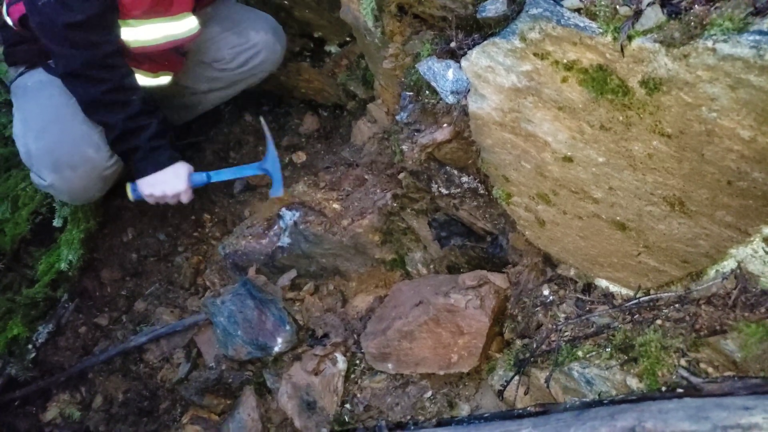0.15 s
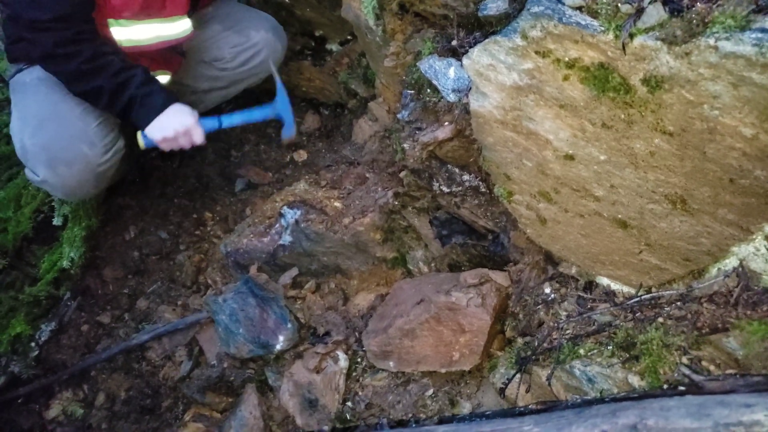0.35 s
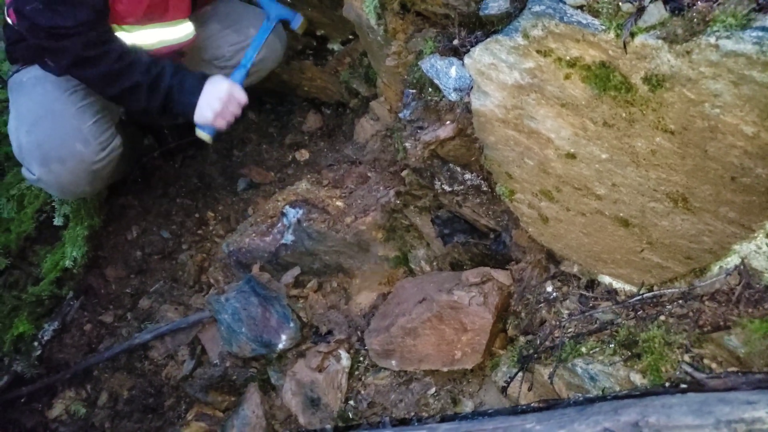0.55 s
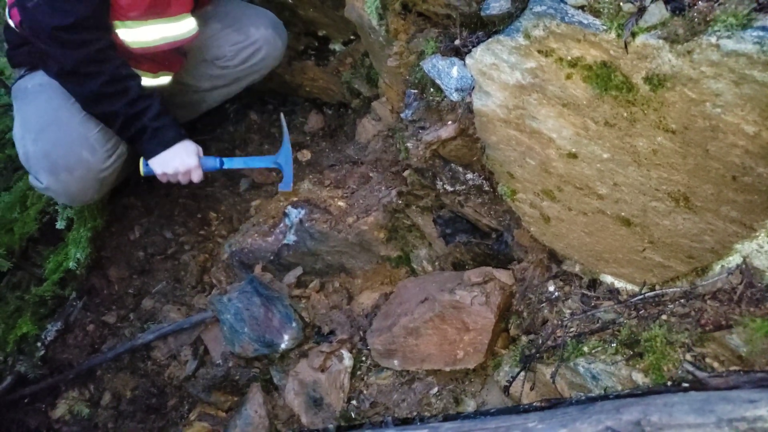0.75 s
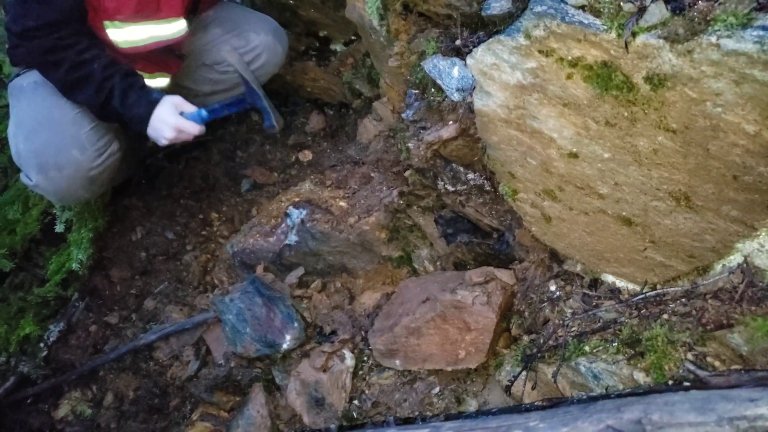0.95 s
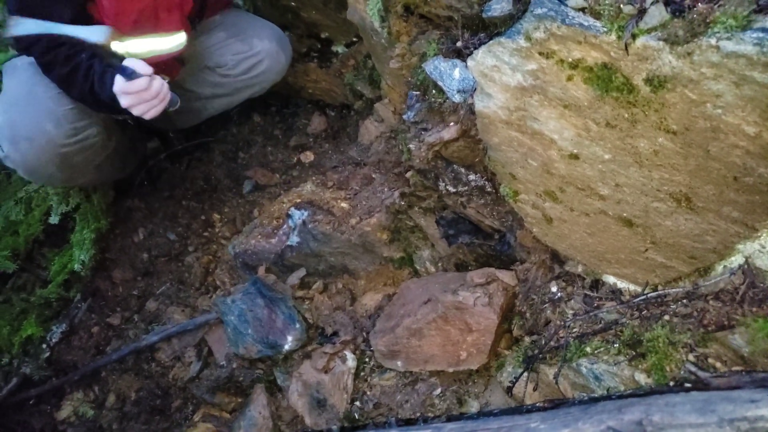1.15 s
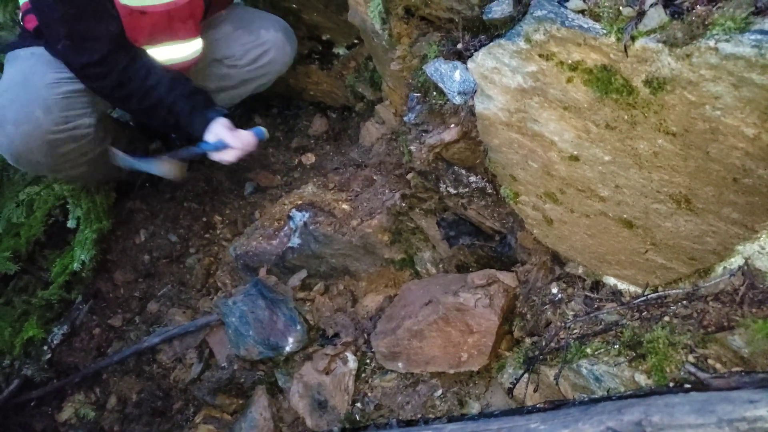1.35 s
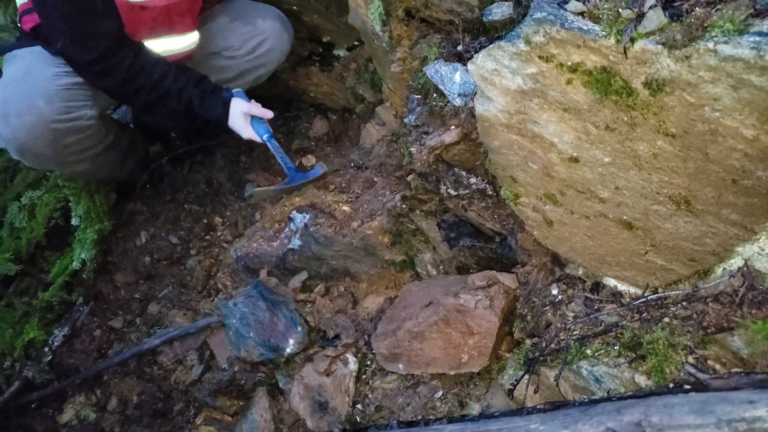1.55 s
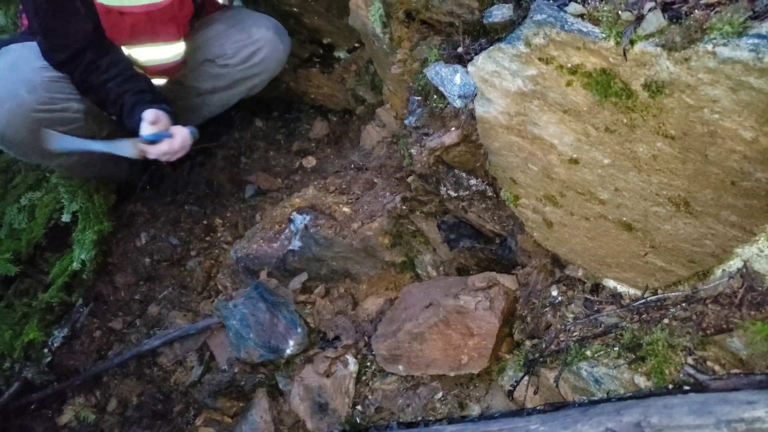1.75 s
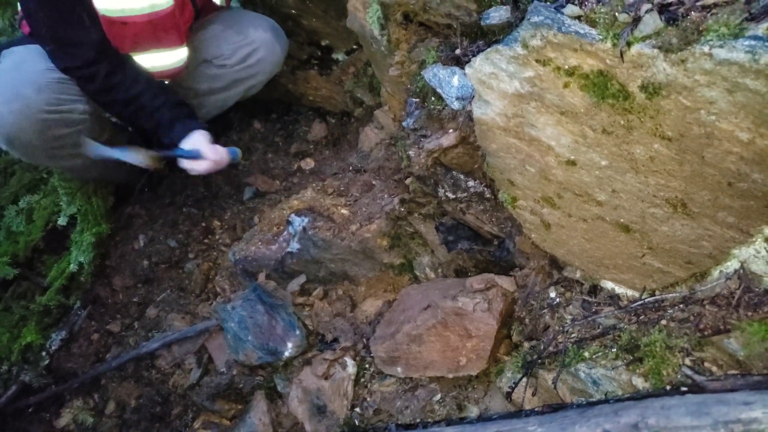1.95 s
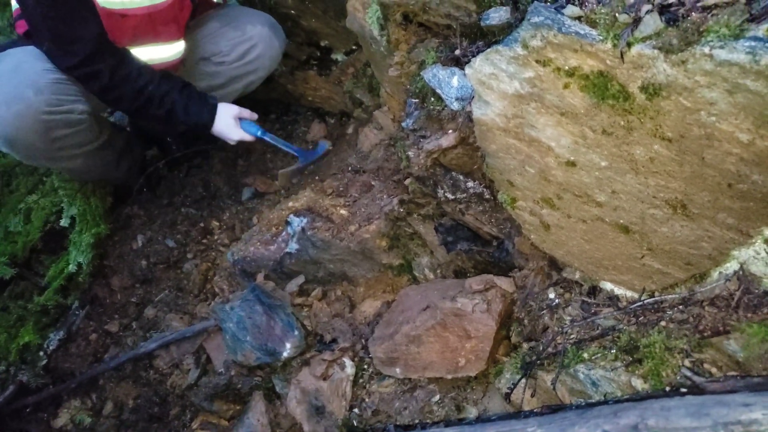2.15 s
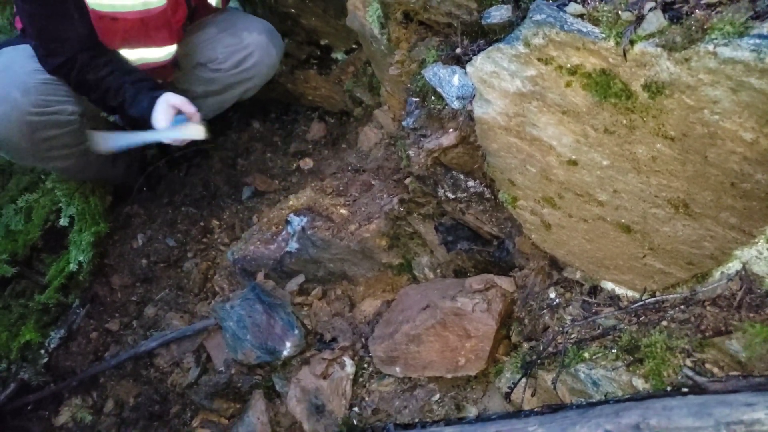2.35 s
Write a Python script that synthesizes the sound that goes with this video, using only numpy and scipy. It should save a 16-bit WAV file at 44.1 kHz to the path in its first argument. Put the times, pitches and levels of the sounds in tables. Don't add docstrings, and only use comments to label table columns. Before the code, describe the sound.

Four separate hammer blows crack on rock, the first loudest, the second thuddiest, the last softest. Loose grit patters, a sleeve rustles and the grip creaks faintly outdoors, heard close and dry, leaning left.

```python
import sys
import numpy as np
from scipy import signal
from scipy.fft import rfft, irfft
from scipy.io import wavfile
from scipy.ndimage import uniform_filter1d

SR = 44100
rng = np.random.default_rng(int(sys.argv[2]) if len(sys.argv) > 2 else 0)


def transcribe(signal):
    frames = np.atleast_2d(signal).T
    limited = np.clip(frames, -1, 1)
    pcm = np.round(limited * 32767).astype(np.int16)
    wavfile.write(sys.argv[1], SR, pcm)


def boost(x):
    u = np.asarray(x, float) / 20
    return 10 ** u


N = 105840
GRAZE_S = 0.003
CRUSH_S = 0.000628


def evened(x):
    return x / np.sqrt(np.mean(x ** 2) + 1e-20)


def left_right(db):
    return boost(np.array([[db], [-db]]))


def read(points, hz):
    f, value = np.transpose(points)
    return np.interp(np.log(hz + 1), np.log(f + 1), value)


def add(mix, s, sound):
    part = mix[..., round(s * SR):][..., :sound.shape[-1]]
    part += sound[..., :part.shape[-1]]


def high_pass(x, order, hz):
    return signal.sosfilt(signal.butter(order, hz, "high", fs=SR, output="sos"), x)


def colour(x, points):
    half = np.log(boost(read(points, np.fft.rfftfreq(2048, 1 / SR))))
    full = np.r_[half, half[-2:0:-1]]
    response = np.exp(full - 1j * signal.hilbert(full).imag)
    taps = np.fft.ifft(response).real[:1024]
    return signal.oaconvolve(x, taps / np.linalg.norm(taps))[:len(x)]


def ring(modes, t):
    return sum(boost(db - 60 * t / t60) * np.sin(2 * np.pi * hz * t) for hz, db, t60 in modes)


def grit(count, rough_db):
    size_db = rough_db * np.minimum(rng.exponential(1, count), 4)
    return evened(rng.standard_normal(count) * boost(size_db))


def hiss(points, patchy_db):
    # pitch_hz, likeness (1 = identical)
    likeness = [(60, 0.91), (200, 0.97), (550, 0.14), (1500, 0.01)]
    frames, hz = N // 128 + 5, np.fft.rfftfreq(1024, 1 / SR)
    a, b, c, d, patches = rng.standard_normal((frames // 2 + 5, 513, 5)).T
    patches = evened(uniform_filter1d(uniform_filter1d(patches, 10, 0), 8, 1))
    same = np.clip(read(likeness, hz), -1, 1)[:, None]
    left = a + 1j * b
    right = same * left + np.sqrt(1 - same ** 2) * (c + 1j * d)
    z = np.array([left, right])
    z *= boost(read(points, hz)[:, None] + patchy_db * patches)
    z *= (hz < 15750)[:, None]
    return evened(signal.istft(z, nperseg=1024, noverlap=768)[1][:, :N])


def open_air():
    # pitch_hz, level_db (per Hz)
    rumble = [(12, -47.5), (20, -14.5), (70, 5), (381, -22), (476, -24), (605, -18), (1200, -37.5),
              (1560, -73), (2640, -120)]
    # pitch_hz, level_db (per Hz)
    leaves = [(800, -16), (1720, -2.5), (2590, -23), (3300, -25), (4310, -4), (7400, 12), (9000, -5),
              (15100, 6)]
    return boost(-60) * hiss(rumble, 1.7) + boost(-75.5) * hiss(leaves, 1.5)


def sleeve():
    # time_s, level_db
    movement = [(0, -59.5), (.2, -52), (0.359, -66), (0.599, -67), (.92, -59), (1.0, -60.5), (1.2, -62),
                (1.3, -51), (1.46, -50), (1.66, -64), (1.98, -63.5), (2.028, -53), (2.22, -62.5),
                (2.4, -55)]
    # pitch_hz, level_db (per Hz)
    cloth = [(120, -24), (200, -5.5), (1000, -14), (1940, -14), (3300, -23), (7500, -18.5), (8800, -26.5),
             (15000, -19)]
    s, db = np.transpose(movement)
    level = boost(np.interp(np.arange(N) / SR, s, db) - 5.5)
    return level * hiss(cloth, 4.1) * left_right(1.5)


def grip():
    # time_s, level_db, lowest_mode_db
    creaks = [(0.175, -42, -19.5), (1.22, -52, -7), (1.288, -49.5, -23), (1.317, -54.5, 0),
              (1.363, -57.5, 9), (1.386, -68, 9), (1.407, -47, 0), (1.439, -47, -6), (1.565, -53.5, -5),
              (1.618, -53, -3.5), (1.807, -52, 4), (1.836, -50, 0.5), (1.866, -51, 2.5),
              (2.366, -48.5, -41)]
    # pitch_hz, level_db, t60_s (time to fall by 60 dB)
    handle = [(244, 12, 0.015), (560, -4, 0.035), (846, 2, 0.019), (1490, -19.5, 0.019)]
    # start_s, end_s, level_db
    turns = [
        (1.213, 1.472, -67),
    ]
    # pitch_hz, level_db, t60_s
    rubbed = [(420, -11, 0.016), (780, -0.5, 0.03), (1550, 4, 0.015), (2000, -2, 0.033)]
    rubs_per_s, turn_edge_s = 1100, 0.089
    out, t, clock = np.zeros((2, N)), np.arange(2000) / SR, np.arange(N) / SR
    for s, db, low_db in creaks:
        knock = boost(low_db) * ring(handle[:1], t)
        knock = knock + ring(handle[1:], t * rng.uniform(.95, 1.05))
        add(out, s - .001, boost(db - 0.5) * np.array([knock, knock]) * np.minimum(t / 0.0027, 1))
    effort = np.zeros(N)
    for start, end, db in turns:
        effort += boost(db) * np.clip(np.minimum(clock - start, end - clock) / turn_edge_s, 0, 1)
    rubs = rng.standard_normal((2, N)) * boost(1.3 * rng.exponential(1, N))
    rubs = rubs * (rng.random(N) < rubs_per_s / SR)
    turning = signal.oaconvolve(effort * rubs, ring(rubbed, t)[None])[:, :N]
    return (out + turning) * left_right(1.5)


def chips():
    # time_s, level_db, lowest_hz, length_s
    falls = [(0.4306, -41, 3500, 0.00083), (0.503, -52.5, 3600, 0.0029), (0.578, -51.5, 6230, 0.0022),
             (0.657, -53.5, 5800, 0.01), (0.826, -48.5, 3670, 0.0036), (0.9481, -33.5, 1460, 0.0019),
             (1.04, -40, 4040, 0.0027), (1.083, -52, 4960, 0.0065), (1.0983, -37.5, 4360, 0.0024),
             (1.109, -44, 4100, 0.0035), (1.057, -45.5, 4040, .002), (.9995, -48, 4000, 0.0025),
             (.941, -46.5, 4440, 0.003), (1.125, -47, 4100, 0.003), (1.658, -48.5, 5830, 0.0028),
             (1.68, -42.5, 2500, 0.0012), (1.746, -47.5, 4700, 0.0013), (1.785, -53, 6100, 0.0023),
             (2.156, -54, 2000, 0.0012), (2.174, -46.5, 2160, 0.0022), (2.1753, -41.5, 2000, 0.0031),
             (2.204, -43.5, 2670, 0.0026), (2.24, -50, 3530, 0.0033), (.378, -52.5, 5500, 0.0025),
             (0.449, -50.5, 6100, 0.0037), (0.53, -53.5, 6200, .003), (1.691, -51.5, 3000, 0.0027),
             (2.285, -55.5, 4500, 0.0026), (0.366, -54.5, 1500, .003)]
    # pitch_hz, level_db (per Hz)
    tick_colour = [(880, -14), (1500, 2.5), (2410, -7), (3880, -10), (5380, -1), (8740, -11), (14900, -6),
                   (16000, -25.5)]
    trickle_db, trickle_s = -21.5, 0.052
    out, t = np.zeros((2, N)), np.arange(4000) / SR
    for s, db, low_hz, length in falls:
        shape = np.exp(-t / length) + boost(trickle_db) * np.exp(-t / trickle_s)
        shape = shape * np.minimum(t / 0.00055, 1)
        burst = [colour(grit(count=4000, rough_db=2.5) * shape, tick_colour) for port in (0, 1)]
        tick = high_pass(burst, 3, low_hz)
        tick = signal.sosfilt(signal.butter(8, 15600, fs=SR, output="sos"), tick)
        add(out, s - .0005, boost(db - 2.0) * tick * left_right(2.5))
    return out


def ground_thud(t, row, delay, back_db, ground):
    # pitch_hz, level_db, t60_s
    deep = [(92, -17, 0.027)]
    # pitch_hz, level_db, t60_s
    upper = [(296.4, -0.5, 0.039), (253, -7.5, 0.07), (434, -1, 0.031), (574, -8, 0.028), (739, -10, 0.022)]
    crack_db, deep_db, upper_db = row[1:4]
    deep_hz, deep_t60, ratio, lag = ground
    late = np.maximum(t - lag, 0)
    thud = boost(deep_db + 11.5) * ring(deep + [(deep_hz, 6, deep_t60)], late)
    thud = thud + boost(upper_db + 7.5) * ring(upper, late * ratio)
    thud = thud * np.minimum(late / 0.0025, 1)
    return thud + boost(back_db - crack_db + 1) * np.interp(t - delay, t, thud, left=0)


def rebound_grit(t, delay, rebound, clumps):
    # pitch_hz, level_db (per Hz)
    grit_colour = [(290, -28), (500, 0.5), (1050, -8.5), (3290, -5), (3920, -5.5), (7420, -3.5),
                   (8450, -12), (14900, -6.5), (16000, -30.5)]
    back_db, length, slide_db, slide_t60 = rebound
    after = np.maximum(t, 0)
    back = boost(back_db) * np.exp(-np.abs(t - delay) / (length * np.where(t < delay, .3, .55)))
    slide = boost(slide_db - 60 * after / slide_t60) * np.minimum(after / 0.076, 1)
    return colour(grit(count=len(t), rough_db=1.0) * (back + slide) * clumps, grit_colour)


def steel_head(t, row, delay, back_db):
    # pitch_hz, level_db, t60_s
    steel = [(6870, 0.5, 0.092), (6940, -12, .04)]
    # pitch_hz, level_db (over the rebound grit), t60_s
    bounce = [(584, -5, .02), (2500, -4.5, 0.01), (4700, -5, .015)]
    mute_s, mute_db_per_s = 0.004, 3000
    crack_db, steel_db = row[1], row[4]
    bounced = np.maximum(t - delay, 0)
    head = ring(steel, np.maximum(t - CRUSH_S, 0))
    head = head + boost(back_db - crack_db + 19.0) * ring(steel, bounced)
    head = boost(steel_db) * head * boost(-mute_db_per_s * np.maximum(t - delay - mute_s, 0))
    return head + boost(back_db) * ring(bounce, bounced)


def crushed_stone(t, crack_db, spot, stone):
    graze_db, crush_t60, stop_s, stop_db_per_s = -40, 0.035, 0.0054, 905
    after = np.maximum(t, 0)
    crush = np.minimum(after / CRUSH_S + 0.14, 1) * boost(-60 * after / crush_t60)
    crush = np.where(t < 0, boost(graze_db), crush)
    stop = boost(-stop_db_per_s * np.maximum(t - stop_s, 0))
    crush = crush * stop
    crack = colour(grit(count=len(t), rough_db=1.5) * boost(crack_db - 6.5) * crush, spot)
    struck = np.maximum(t - CRUSH_S, 0)
    return crack + ring(stone, struck) * np.minimum(struck / 0.00088, 1) * stop


def ports(near, far):
    # pitch_hz, difference_db
    shadow = [(700, 3.5), (1100, 12.5), (1700, 3), (3200, 7.5), (5700, 7), (7400, 18.5), (8600, 11.5),
              (10000, 3.5)]
    far_delay_s = 0.00013
    hz = np.fft.rfftfreq(N, 1 / SR)
    heard = rfft(far) * np.exp(-2j * np.pi * hz * far_delay_s) / boost(read(shadow, hz))
    return np.array([near, irfft(heard, N)])


def blows():
    # time_s, crack_db, deep_thud_db, upper_thud_db, steel_ring_db
    strikes = [
        (0.2314, -9, -35.5, -27, -35),
        (0.7372, -13.5, -33, -21, -55),
        (1.499, -15, -45, -36, -33.5),
        (2.1069, -16, -55, -33, -55),
    ]
    # pitch_hz, level_db (per Hz)
    spots = [
        [(530, 0.5), (900, -16), (3040, -12), (3960, -12), (5610, -1.5), (8350, -11.5), (15100, -14),
         (16000, -39.5)],
        [(530, -14), (900, -1.5), (1990, -15), (2600, -3.5), (6970, -7.5), (9200, -15.5), (14900, -5.5),
         (16000, -20.5)],
        [(530, -62.5), (900, -11.5), (3590, -6.5), (4680, -14), (6970, -2.5), (9310, -11.5), (14500, -2.5),
         (16000, -20)],
        [(530, -37), (900, -6.5), (2140, -9), (3110, -9), (7680, -7.5), (8350, -11), (13400, -14), (16000, -13)],
    ]
    # pitch_hz, level_db, t60_s
    stones = [
        [(1306, -29.5, .022), (1770, -30.5, 0.023), (2866, -25.5, 0.043), (3520, -27, .022),
         (4550, -22.5, .018), (5530, -15, 0.02), (6140, -32, .02), (6600, -23.5, 0.02), (7410, -23, .02),
         (8230, -30, 0.013)],
        [(899, -28, 0.029), (1500, -27.5, 0.012), (2000, -28.5, 0.024), (2590, -20.5, 0.018),
         (2987, -23, 0.016), (3580, -28, .02), (4595, -20, 0.029), (5120, -33, .012), (7085, -22.5, .014),
         (7740, -26.5, 0.017)],
        [(1330, -26.5, 0.024), (1740, -27, 0.019), (2250, -27, 0.017), (3730, -27, 0.019), (4200, -25, 0.021),
         (5600, -31, .015), (6450, -38, .014), (6960, -20, 0.016), (8300, -30, 0.014), (14960, -27, 0.03)],
        [(1297, -21.5, 0.017), (2500, -38, 0.014), (3125, -26.5, 0.028), (4270, -45, 0.023), (4710, -17, 0.02),
         (5040, -26.5, .02), (5500, -27, .014), (6950, -28.5, .018), (7730, -27, 0.026), (8400, -45, .01)],
    ]
    delays = [.033, .031, .0265, .0215]
    # level_db, t60_s
    rebounds = [(-39.5, 0.0085, -44, 0.33), (-39.5, 0.007, -48.5, 0.35), (-34.5, 0.0054, -46, 0.34),
                (-30, 0.0059, -40, 0.2)]
    # deep_hz, deep_t60_s, upper_pitch_ratio, lag_s
    grounds = [(172, 0.041, 0.95, 0.00061), (192, 0.036, 1.018, 0.00171), (176, 0.036, .9, 0.0012),
               (189.6, 0.12, 1, 0.00093)]
    t = np.arange(0, .45, 1 / SR) - GRAZE_S
    bright, thuds = np.zeros((2, N)), np.zeros(N)
    for row, spot, stone, delay, rebound, ground in zip(strikes, spots, stones, delays, rebounds, grounds):
        start, back_db = row[0] - GRAZE_S, rebound[0]
        clumps = boost(2 * evened(uniform_filter1d(rng.standard_normal(len(t)), size=90)))
        head = steel_head(t, row, delay, back_db)
        pair = [crushed_stone(t, row[1], spot, stone) + rebound_grit(t, delay, rebound, clumps) + head
                for port in (0, 1)]
        add(bright, start, np.array(pair))
        add(thuds, start, ground_thud(t, row, delay, back_db, ground))
    bright = high_pass(bright, 2, 350)
    return boost(3.5) * ports(*bright) + thuds * left_right(1)


def scene():
    return blows() + chips() + grip() + sleeve() + open_air()


def roll_off(x):
    return signal.sosfilt(signal.butter(12, 16660, fs=SR, output="sos"), x)


def record(dry):
    cut = high_pass(dry, 3, 54.4)
    return roll_off(cut)


dry = scene()
out = record(dry)
transcribe(out)
```